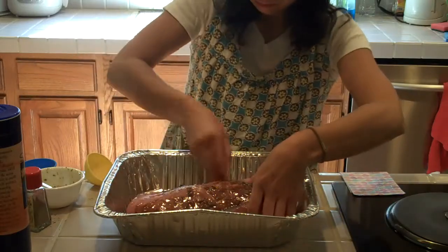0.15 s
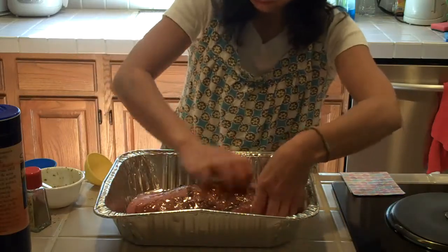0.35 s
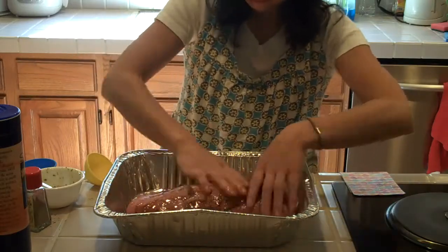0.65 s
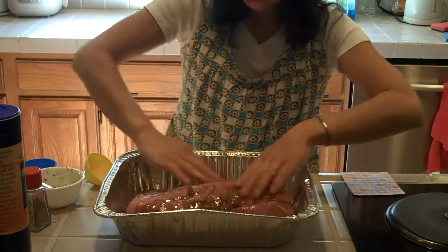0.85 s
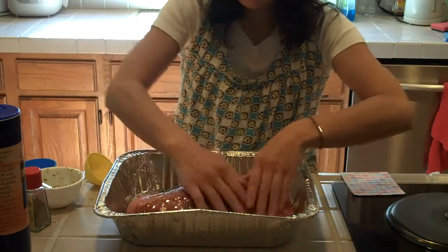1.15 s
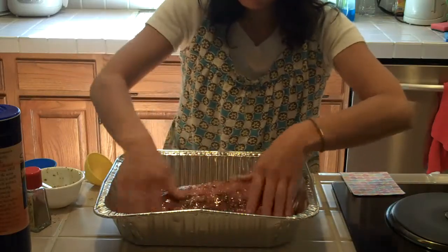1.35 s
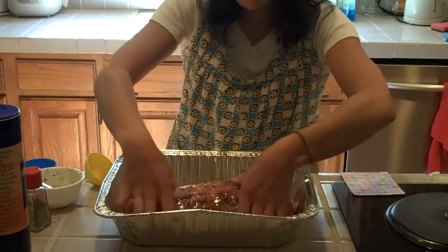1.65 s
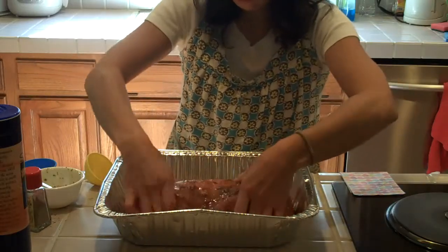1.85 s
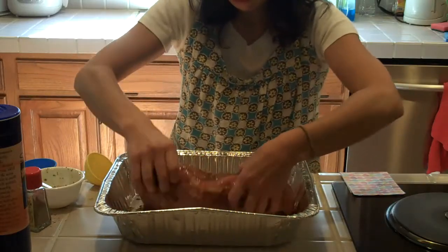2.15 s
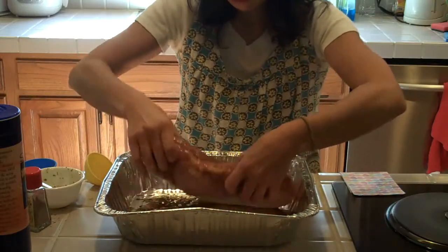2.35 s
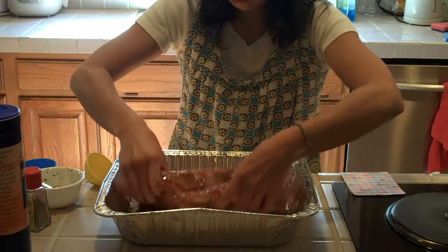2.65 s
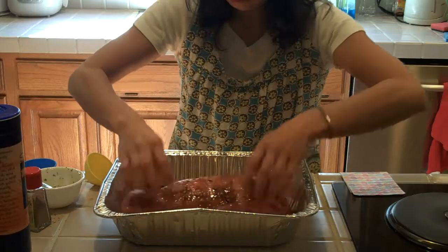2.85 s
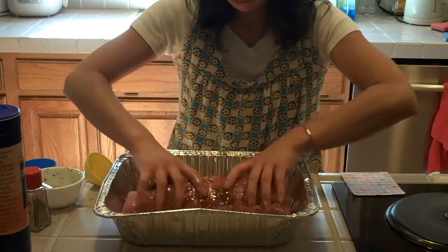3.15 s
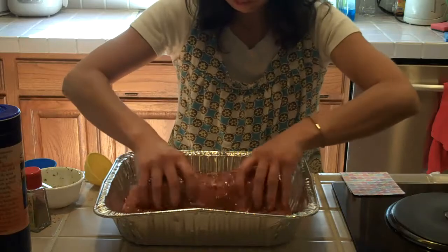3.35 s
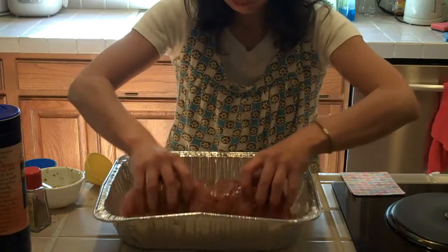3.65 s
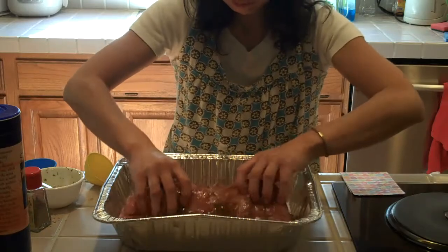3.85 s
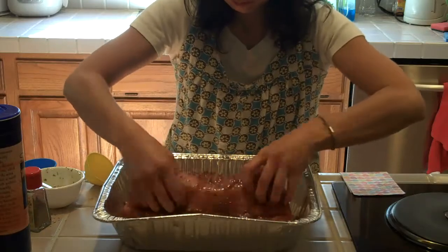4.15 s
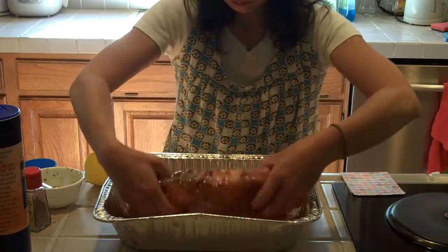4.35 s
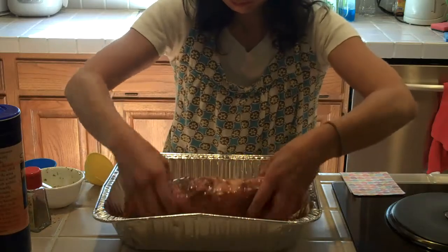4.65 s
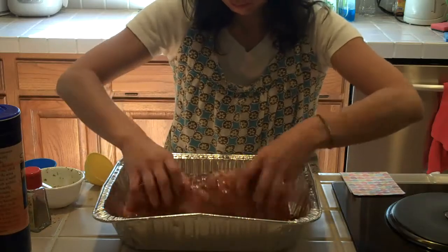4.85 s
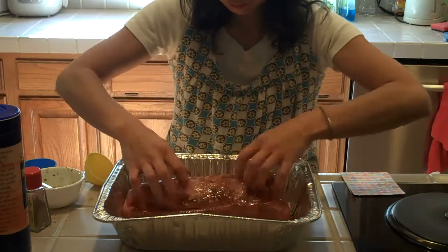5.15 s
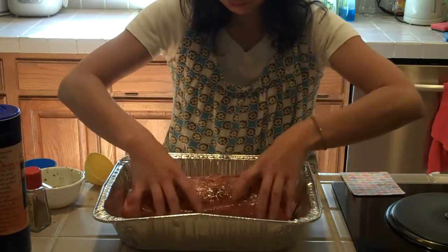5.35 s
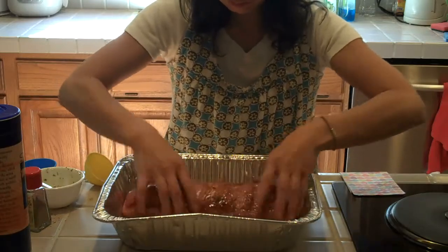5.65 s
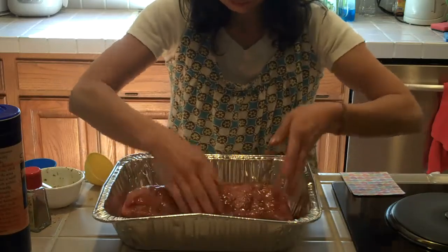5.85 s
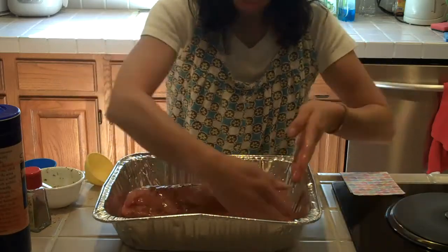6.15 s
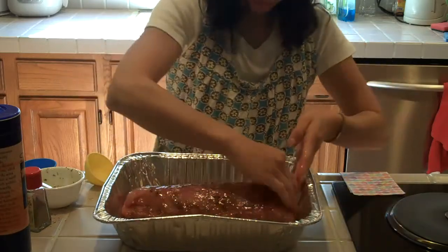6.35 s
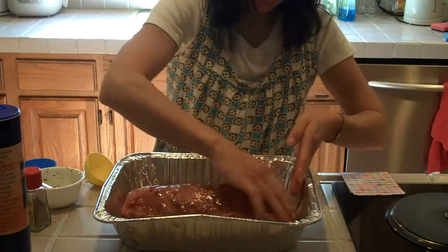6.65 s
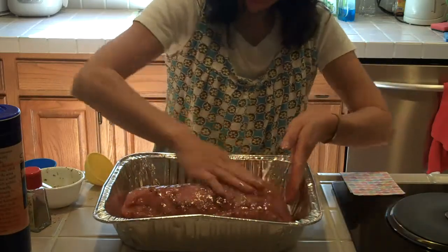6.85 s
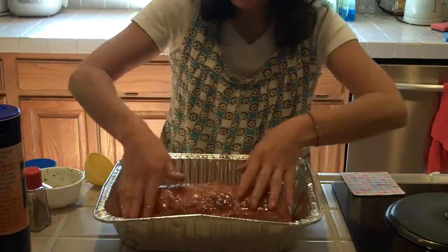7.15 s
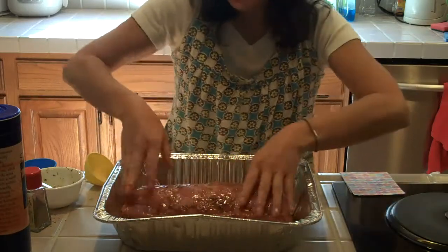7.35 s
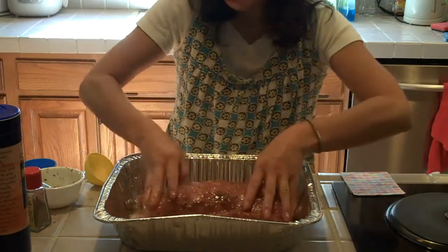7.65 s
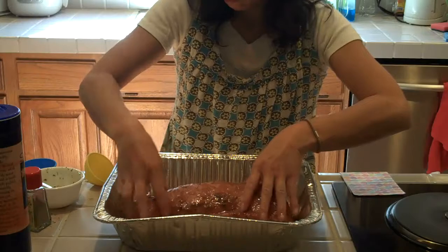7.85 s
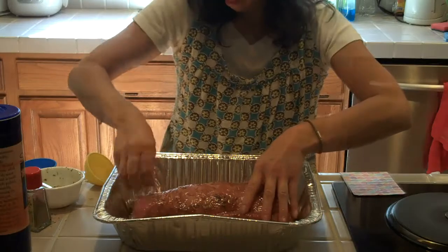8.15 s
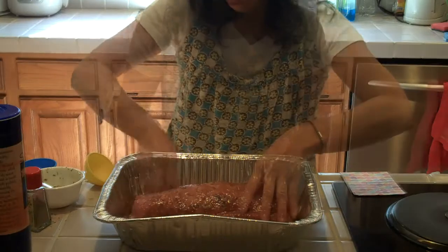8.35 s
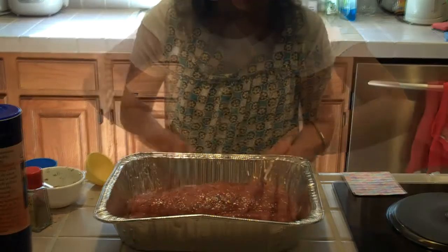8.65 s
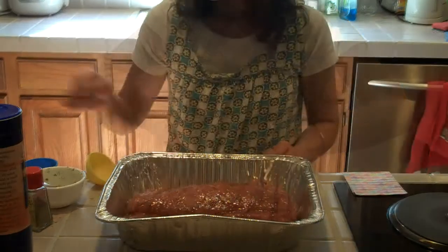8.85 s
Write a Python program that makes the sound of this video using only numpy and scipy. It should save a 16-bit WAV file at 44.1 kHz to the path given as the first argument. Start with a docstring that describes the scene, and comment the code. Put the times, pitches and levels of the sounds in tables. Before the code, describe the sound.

Thin aluminium pops, ticks and short ribbed scrapes alternate with very soft wet smears as meat is rubbed and pressed. The loudest snaps fall near two and six seconds, with a busy crinkle around four and final pops at the end. Short bright room reflections follow each. Mono, fairly near microphone, with faint wavering hum and air noise; a far rush dies away.

```python
"""Seasoning meat in a foil pan

Hands rub seasoning into raw meat in a thin aluminium foil pan on a tiled kitchen counter.
The pan buckles in sharp snaps: noise bursts ring its floor, wall creases and fine foil.
Between them, trains of random grains make the fingers' scrape on foil and smear on wet meat.
Damped sines make low thuds and short hollow rings of the pan floor as the meat is pressed.
A hard kitchen answers snaps and strokes with diffuse tails. An appliance hums faintly in
wavering tones and air noise, and a far rush dies away."""
import sys
import numpy as np
from scipy import signal
from scipy.fft import rfft, irfft, next_fast_len
from scipy.io import wavfile
from scipy.ndimage import map_coordinates

SR = 44100
rng = np.random.default_rng(int(sys.argv[2]) if len(sys.argv) > 2 else 0)


def persist_wave(psi):
    """Save psi, clipped to +-1, as 16-bit WAV."""
    counts = np.round(np.clip(psi, -1, 1) * 32767).astype(np.int16)
    wavfile.write(sys.argv[1], SR, np.atleast_2d(counts).T)


N = 396886

# foil buckles: (time [s], pan floor level [dB], wall crease level [dB], fine tick level [dB])
SNAPS = [(0.011, -63, -43, -40), (0.0263, -61, -43, -52), (0.7775, -62, -66, -61.5),
         (1.0038, -41, -44, -63), (1.537, -62, -42, -60), (1.564, -56, -55, -61),
         (1.5953, -39, -42.5, -48.5), (1.682, -54, -50.5, -56), (1.7396, -42, -44, -53.5),
         (1.9242, -42, -45, -48.5), (1.9684, -40.5, -41.5, -46), (2.0188, -49.5, -39.5, -50.5),
         (2.2261, -22.5, -22, -36.5), (2.6764, -39.5, -38, -49), (2.7317, -49.5, -47.5, -50.5),
         (2.901, -56, -43, -57), (3.2426, -39, -37, -49), (3.2698, -41.5, -41.5, -49.5),
         (3.485, -53.5, -59, -72), (3.626, -51, -55.5, -74), (3.696, -42.5, -51, -68),
         (3.8469, -47, -36, -38.5), (3.8808, -45, -39, -58), (3.903, -39.5, -36, -55),
         (3.9137, -31.5, -42, -61), (3.9333, -37, -45, -60), (3.9493, -33.5, -37, -42.5),
         (3.9652, -36, -54, -70), (4.4137, -40, -66, -73), (4.706, -66, -56, -63),
         (5.1729, -47.5, -52, -57.5), (5.2958, -57, -67, -66.5), (5.4694, -45, -44, -49.5),
         (5.5144, -47, -41, -59), (5.5325, -56, -41, -60), (5.7998, -45.5, -55.5, -59),
         (6.1272, -29.5, -38.5, -37), (6.1497, -29.5, -42, -47), (6.163, -33.5, -27.5, -38),
         (6.2297, -40, -43, -45), (6.3553, -40, -43, -44.5), (6.366, -33.5, -35.5, -43),
         (6.4155, -24, -27.5, -39.5), (6.5698, -44.5, -43.5, -63), (7.0056, -76, -78, -59.5),
         (7.3263, -44.5, -41, -43.5), (7.6306, -47, -47.5, -59), (8.4309, -41.5, -33.5, -43),
         (8.449, -36.5, -36.5, -50), (8.712, -33, -32.5, -52.5)]
# colour of the pan floor, before its pitch shifts: (frequency [Hz], level [dB])
PAN_FLOOR = [(60, -55), (200, -24.5), (450, -9.5), (720, -1), (980, 3), (1350, 4.5), (1700, -3.5),
             (2600, -27.5), (6000, -46)]
# colour of the wall creases, before their treble tilt: (frequency [Hz], level [dB])
CREASE = [(500, -36), (1300, -8.5), (2100, 3), (2800, -0.5), (3400, 3.5), (5000, 1), (7000, -8.5),
          (14000, -38)]
# colour of the fine foil tick: (frequency [Hz], level [dB])
TICK = [(1500, -16), (4300, -19), (6200, 6.5), (8500, 2.5), (11000, -3.5), (14000, -16)]
# pan resonances: (frequency [Hz], width [Hz], level [dB])
PAN_MODES = [(757.5, 12, 1), (837, 8.7, -32), (1020, 10, -23), (1109, 20, 0), (1391, 36, -0.5),
             (1487, 33, -11), (1730, 17, -18), (2230, 27, -14), (2760, 38, -21), (3060, 63, -14),
             (3870, 39, -9), (4300, 74, -8), (5420, 82, -9)]
# floor ring, moved by the weight of the meat: (time [s], centre [Hz])
FLOOR_PITCH = [(1, 1010), (1.55, 1370), (2.23, 1150), (3.26, 1250), (3.7, 920), (3.9, 1100), (4.4, 1090),
               (5.5, 1306), (6.42, 1073), (8.45, 1145), (8.7, 1360)]
# fingers dragged over ribbed foil: (start [s], length [s], level [dB])
SCRAPES = [(0, 0.06, -49), (1.44, 0.046, -49.5), (1.499, 0.36, -56.5), (1.841, 0.041, -46.5),
           (1.941, 0.088, -50.5), (2.725, 0.059, -59.5), (3.27, 0.071, -46.5), (3.825, 0.075, -39.5),
           (3.906, 0.16, -54), (5.509, 0.088, -52.5), (6.171, 0.11, -49), (6.506, 0.052, -48.5),
           (7.34, 0.071, -53), (7.545, 0.043, -49.5), (7.633, 0.07, -58), (8.443, 0.032, -44.5)]
# palm slides over wet meat: (middle [s], length [s], level [dB])
SMEARS = [(1.007, 0.054, -60.5), (2.474, 0.06, -69.5), (2.883, 0.23, -57.5), (3.582, 0.53, -67),
          (3.79, 0.1, -57), (3.859, 0.11, -47), (4.267, 0.22, -57.5), (4.425, 0.26, -61.5),
          (4.698, 0.16, -64.5), (5.116, 0.2, -67.5), (5.748, 0.25, -64.5), (5.851, 0.078, -59),
          (6.82, 0.14, -68), (6.959, 0.11, -70.5), (7.756, 0.19, -61), (8.138, 0.048, -65),
          (8.38, 0.043, -59.5), (8.59, 0.14, -61)]
# colour of scraped foil: (frequency [Hz], level [dB])
SCRAPE_COLOUR = [(300, -18), (700, -2.5), (1200, 4), (2000, 4.5), (3800, 1.5), (6000, -1.5), (14000, -36)]
# colour of smeared wet meat: (frequency [Hz], level [dB])
SMEAR_COLOUR = [(1000, -37), (2800, 1.5), (4500, 1), (7500, 2.5), (10000, 0.5), (14000, -11.5)]
# low thuds, and short hollow rings of the pan floor as the meat is pressed:
# (time [s], frequency [Hz], level [dB])
THUDS_AND_RINGS = [(2.226, 86, -68), (3.243, 470.3, -49), (3.915, 575, -39), (3.95, 262, -50),
                   (6.129, 200.3, -54), (6.77, 45, -63), (8.434, 204, -48.5)]
# steady appliance tones, before wobble and fade: (frequency [Hz], level [dB])
HUM = [(119, -81), (172, -87.5), (522.2, -68.5), (845.2, -75)]
# colour of the appliance's air noise: (frequency [Hz], level [dB])
AIR = [(8, -12), (22, 4.5), (45, -11), (100, -10), (170, -15.5), (250, -11.5), (340, -0.5), (385, -5),
       (412, 2), (440, -1), (560, -7), (680, -12), (1400, -11.5), (2500, -19), (7000, -25.5),
       (14000, -34.5)]
# far rush that dies away: (time [s], level [dB])
RUSH_LEVEL = [(0, -61.5), (1.5, -62), (3.3, -58.5), (4.6, -61), (7, -80.5)]
# colour of the far rush: (frequency [Hz], level [dB])
RUSH_COLOUR = [(60, -33), (190, -6.5), (260, 8.5), (350, -5), (480, 6.5), (620, 0), (900, -0.5),
               (1500, -7.5), (3000, -16.5), (9000, -35)]
# kitchen decay: (frequency [Hz], t60 [s])
KITCHEN_T60 = [(150, 0.54), (1000, 0.44), (3000, 0.45), (7000, 0.41), (14000, 0.25)]
# first echoes, nominal: (delay [s], level [dB])
WALLS = [(.0098, -12.5), (0.0218, -13.5), (0.0407, -26)]

EVEN_FLOOR_HZ = 1173  # middle of the floor's ring when the pan is evenly loaded
BASE_LIFE_S = 0.0057  # scaled per snap and per part of the pan
SOFT_DOUBLING_DB = 43  # a soft press, this much more floor than crease, takes twice as long
STRAYS_PER_S, STRAY_SCATTER_DB, STRAY_TICK_DB = 22, 3, -7.5
SCRAPE_WET_DB, SMEAR_FOIL_DB = -4.5, -3  # the other material, relative to the stroke
KNEADING_DB = -83  # the fingers never quite leave the wet meat
TOP_HZ = 14150


def amp(db):
    """Decibels to gain."""
    return 10 ** (np.asarray(db) / 20)


def unit(x):
    """Scale to rms 1."""
    return x / np.sqrt(np.mean(x ** 2) + 1e-20)


def along(points, hz):
    """Read (Hz, value) points on a log-frequency axis."""
    point_hz, values = np.transpose(points)
    return np.interp(np.log(hz + 1), np.log(point_hz + 1), values)


def wobble(knots_per_s):
    """Smooth random curve through normally distributed knots."""
    knots = rng.standard_normal(int(N * knots_per_s / SR) + 4)
    return map_coordinates(knots, [np.arange(N) * knots_per_s / SR])


def filtered(x, response):
    """Multiply the spectrum of x by a function of frequency in Hz."""
    size = next_fast_len(N + SR // 2)
    hz = np.fft.rfftfreq(size, 1 / SR)
    return irfft(rfft(x, size) * response(hz), size)[:N]


def add(track, time_s, sound):
    """Mix a sound into the track, cut at the track's end."""
    start = max(0, round(time_s * SR))
    part = track[start:start + len(sound)]
    part += sound[:len(part)]


def snaps():
    """Each snap shakes the loaded floor and creases of the pan longest, its fine tick most briefly."""
    track = np.zeros(N)
    for time_s, floor_db, crease_db, tick_db in SNAPS + strays():
        shift = np.interp(time_s, *np.transpose(FLOOR_PITCH)) / EVEN_FLOOR_HZ
        life_s = BASE_LIFE_S * 2 ** ((floor_db - crease_db) / SOFT_DOUBLING_DB)
        floor = pan_response([(hz * shift, db) for hz, db in PAN_FLOOR], dents_db=2.13)
        # small stiff creases ring higher
        tilt_db_per_octave = 0.59 * (tick_db - floor_db + 2.5)
        tilted = [(hz, db + tilt_db_per_octave * np.log2(hz / SR)) for hz, db in CREASE]
        crease = pan_response(tilted, dents_db=2.0)
        tick = pan_response(TICK, dents_db=3.0)
        add(track, time_s, amp(floor_db) * buckle(floor, 1.31 * life_s, crack=0.76, tail_db=-2))
        add(track, time_s, amp(crease_db) * buckle(crease, 1.34 * life_s, crack=0.43, tail_db=-6.5))
        add(track, time_s, amp(tick_db) * buckle(tick, 0.86 * life_s, crack=0.55, tail_db=-5.5))
    return track


def strays():
    """Small buckles at random moments of the scrapes, near the scrape's level; rows as in SNAPS."""
    rows = []
    for start_s, length_s, db in SCRAPES:
        chance, place = rng.random((2, 12))  # 12 candidates a scrape
        scatter_db = STRAY_SCATTER_DB * rng.standard_normal((len(place), 3))
        for k in np.flatnonzero(chance < STRAYS_PER_S * length_s / len(place)):
            levels_db = db + scatter_db[k] + [0, 0, STRAY_TICK_DB]
            rows.append((start_s + length_s * place[k], *levels_db))
    return rows


def buckle(response, life_s, crack, tail_db):
    """Creases give way for milliseconds around one crack and ring the pan; echoes and room follow."""
    t = np.arange(SR // 40) / SR
    force = rng.standard_normal(len(t)) * np.exp(-(t / max(life_s, .001)) ** 4.6)
    force *= amp(3.86 * rng.standard_normal(len(t)))  # a few creases give way much harder
    crack_s = rng.uniform(.0003, .0018)
    force[round(crack_s * SR)] += crack * np.linalg.norm(force)
    direct = signal.fftconvolve(force, response)
    direct /= np.sqrt(np.mean(direct[:round(.008 * SR)] ** 2))  # direct sound: rms 1 over 8 ms
    sound = kitchen(response, tail_db, build_up_s=0.0044) * np.linalg.norm(direct)
    add(sound, 0, direct)
    for delay_s, db in WALLS:
        path = 1 + .1 * rng.uniform(-0.91, 1)  # paths change with the place of the snap
        add(sound, delay_s * path, amp(db) * direct)
    return sound


def pan_response(spectrum, dents_db, size=4096):
    """Causal minimum-phase ring of one pan part: broad colour, fixed resonances, random dents."""
    hz = np.fft.rfftfreq(size, 1 / SR)
    peaks = 1 + sum(amp(db) / (1 + (2 * (hz - centre_hz) / width_hz) ** 2)
                    for centre_hz, width_hz, db in PAN_MODES)
    # bent foil is never the same twice: one random knot per 110 Hz
    dents = map_coordinates(rng.standard_normal(size), [hz / 110], mode="mirror")
    magnitude = amp(along(spectrum, hz) + dents_db * dents) * peaks
    # fold the cepstrum onto positive time
    cepstrum = irfft(np.log(magnitude))
    cepstrum[1:size // 2] *= 2
    cepstrum[size // 2 + 1:] = 0
    return irfft(np.exp(rfft(cepstrum)))[:size // 2]


def rubbing():
    """Fingers catch abruptly on ribbed foil; palms glide smoothly over wet meat; faint fizz persists."""
    wet = pan_response(SMEAR_COLOUR, dents_db=-2)
    fizz = signal.fftconvolve(rng.standard_normal(N), wet)[:N]
    track = amp(KNEADING_DB + 1.8 * wobble(11)) * unit(fizz)
    for start_s, length_s, db in SCRAPES:
        add(track, start_s, stroke(length_s, db, db + SCRAPE_WET_DB, rise=0.15, fall=0.11))
    for middle_s, length_s, db in SMEARS:
        sound = stroke(length_s, db + SMEAR_FOIL_DB, db, rise=0.34, fall=0.32)
        add(track, middle_s - length_s / 2, sound)
    return track


def stroke(length_s, scrape_db, smear_db, rise, fall):
    """One hand move: coarse crackle from foil, fine fizz from wet seasoning."""
    foil = pan_response(SCRAPE_COLOUR, dents_db=3.0)
    wet = pan_response(SMEAR_COLOUR, dents_db=1.5)
    scrape = crinkle(foil, length_s, rise, fall, grains_per_s=420, spread_db=5.2, slip_db=2)
    smear = crinkle(wet, length_s, rise, fall, grains_per_s=1100, spread_db=3.0, slip_db=1.3)
    return amp(scrape_db) * scrape + amp(smear_db) * smear


def crinkle(response, length_s, rise, fall, grains_per_s, spread_db, slip_db):
    """Tiny crackles of uneven size, modulated by stick and slip, ring the surface and the room."""
    t = np.arange(max(round(length_s * SR), SR // 100)) / SR
    slip_knots = rng.standard_normal(SR // 100)
    slips = amp(slip_db * map_coordinates(slip_knots, [t * 90], order=1, mode="mirror"))
    sizes = amp(spread_db * np.minimum(rng.exponential(size=SR), 4.5)) * rng.choice([-1, 1], SR)
    grains = np.resize(sizes * (rng.random(SR) < grains_per_s / SR), len(t))
    # the hand gathers speed, then lets go; rise and fall are shares of the stroke
    swell = np.clip(np.minimum(t / rise, (t[-1] - t) / fall) / t[-1], 0, 1)
    heard = kitchen(response, tail_db=2.5)
    add(heard, 0, response / np.linalg.norm(response))
    sound = signal.fftconvolve(grains * slips * swell, heard)
    # total energy of rms 1 over the stroke, room tail included
    return sound * np.sqrt(len(t) / (np.sum(sound ** 2) + 1e-20))


def thuds_and_rings():
    """Low thuds and short hollow floor rings: sines with a gentle onset and a 0.15 s t60."""
    track, t = np.zeros(N), np.arange(SR // 4) / SR
    for time_s, hz, db in THUDS_AND_RINGS:
        onset = 1 - np.exp(-t / 0.0041)
        add(track, time_s, amp(db - 60 * t / 0.15) * np.sin(2 * np.pi * hz * t) * onset)
    return track


def kitchen(colour, tail_db, build_up_s=0.00057):
    """Room's answer to the pan: a fresh diffuse noise tail whose treble dies first."""
    hz, t, cells = signal.stft(rng.standard_normal(SR // 2), SR, nperseg=256)
    decay = amp(-60 * t / along(KITCHEN_T60, hz)[:, None])
    tail = signal.istft(cells * decay, SR, nperseg=256)[1]
    tail *= 1 - np.exp(-(np.arange(len(tail)) / SR / build_up_s) ** 2)
    tail = signal.fftconvolve(tail, colour)
    return amp(tail_db) * tail / np.linalg.norm(tail)


def motor_tone(hz):
    """Sine with slightly wavering level and phase."""
    t = np.arange(N) / SR
    return amp(1.3 * wobble(9)) * unit(np.sin(2 * np.pi * hz * t + .4 * wobble(6)))


def coloured_noise(spectrum):
    """White noise shaped by (Hz, dB) points, rms 1."""
    return unit(filtered(rng.standard_normal(N), lambda hz: amp(along(spectrum, hz))))


def appliance():
    """Steady motor tones and a wavering drone over soft air noise."""
    tones = sum(amp(db) * motor_tone(hz) for hz, db in HUM)
    drone_hz = 411 + 9 * wobble(5)
    drone_level = amp(-70.5 + 3.9 * wobble(9.3))
    drone = drone_level * unit(np.sin(2 * np.pi * np.cumsum(drone_hz) / SR))
    # sinks a little at the end
    fade = amp(np.interp(np.arange(N) / SR, [8.2, 8.9], [0, -3]))
    return fade * (tones + drone + amp(-63.0) * coloured_noise(AIR))


def far_rush():
    """Coloured noise whose level follows a slow curve and dies away."""
    level_db = np.interp(np.arange(N) / SR, *np.transpose(RUSH_LEVEL))
    return amp(level_db) * coloured_noise(RUSH_COLOUR)


def scene():
    """Mono sum of pan snaps, hands, thuds and rings, appliance and far rush."""
    return (snaps() + rubbing() + thuds_and_rings() + appliance() + far_rush())[None]


def record(dry):
    """Very steep low-pass at the band limit."""
    return filtered(dry[0], lambda hz: 1 / np.sqrt(1 + (hz / TOP_HZ) ** 260))[None]


dry = scene()
out = record(dry)
persist_wave(out)
```